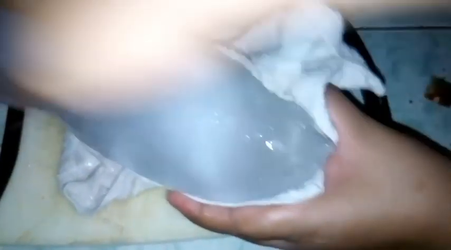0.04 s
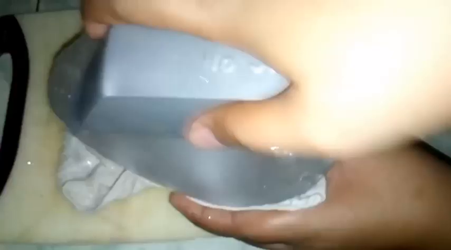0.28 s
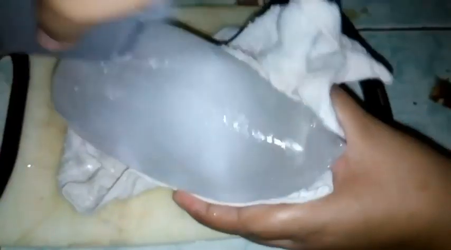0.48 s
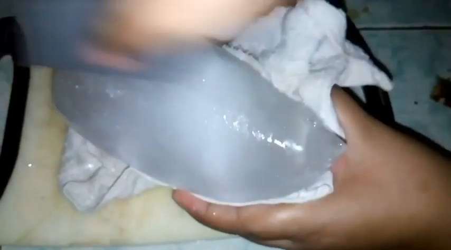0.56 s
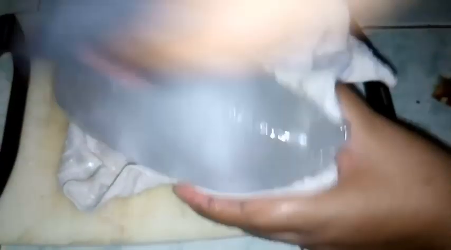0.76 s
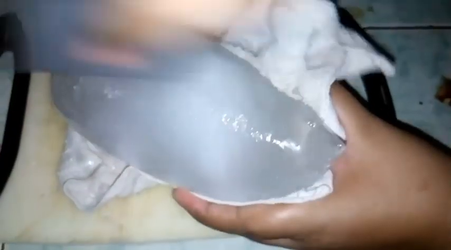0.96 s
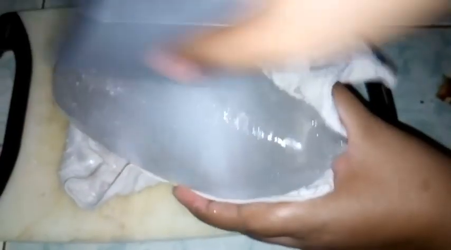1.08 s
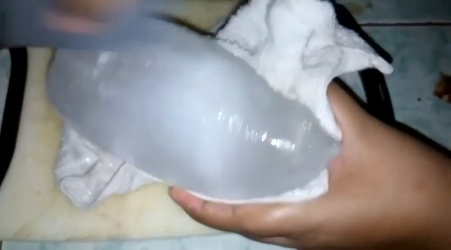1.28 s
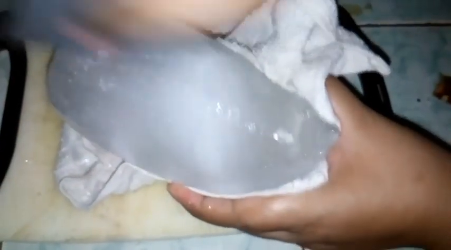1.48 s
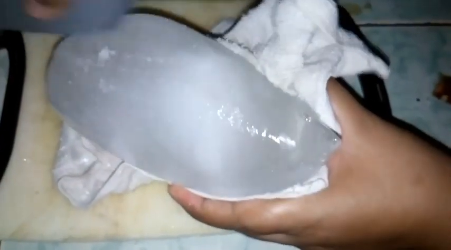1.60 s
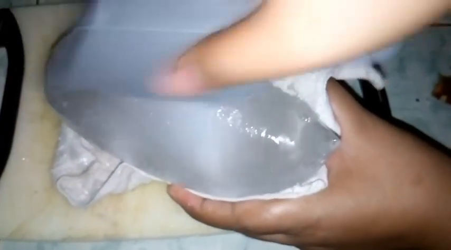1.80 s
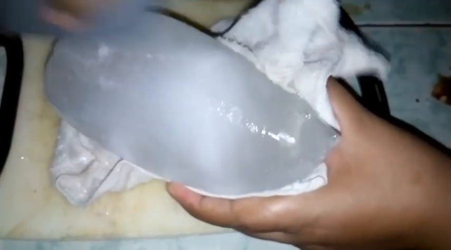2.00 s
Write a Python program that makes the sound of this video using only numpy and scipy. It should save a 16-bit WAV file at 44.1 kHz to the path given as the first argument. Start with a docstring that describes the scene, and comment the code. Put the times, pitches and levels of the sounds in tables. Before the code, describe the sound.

A hand shaver rasps over a block of ice in five short crunchy strokes, with sharp ticks, small knocks and soft return brushes between, and a sixth beginning; close microphone, small kitchen, faint hum.

```python
"""A hand shaver is pushed over a block of ice five times, and a sixth push begins: its blade breaks
off dense runs of tiny chips (random clicks), which ring the shaver and rumble in the block (resonances).
Between pushes it ticks (clicks with splinters), brushes back over the ice and knocks or clunks (noise).
Place: a small kitchen with a faint hum. Distance: near, the direct sound leading reflections and tail.
Microphone: one channel, whose sharpest peaks overload, with the top of the treble cut off."""
import sys
import numpy as np
from scipy import signal
from scipy.fft import rfft, irfft
from scipy.io import wavfile
from scipy.ndimage import uniform_filter1d

SR = 44100
rng = np.random.default_rng(int(sys.argv[2]) if len(sys.argv) > 2 else 0)


def digitize_waveform(pressure):
    """Quantize a signal to 16-bit integers and store it at the path in sys.argv[1].

    Rows of a 2-D input are taken as channels; values are limited to [-1, 1].
    """
    field = np.atleast_2d(pressure).T
    bounded = np.clip(field, -1, 1)
    quanta = np.round(bounded * 32767).astype(np.int16)
    wavfile.write(sys.argv[1], SR, quanta)


N = 90404

# Five pushes, one list each: (time [s], bright rasp level [dB], low crunch level [dB]), before the trims
PUSH_CURVES = [
    [(0.21, -34, -45), (0.224, -21, -36.5), (0.25, -15, -31), (0.29, -20.5, -28.5), (0.312, -20, -30.5),
     (0.321, -52, -47)],
    [(0.567, -37, -45), (0.577, -43.5, -40.5), (0.589, -22.5, -37), (0.631, -20, -28.5), (0.651, -22, -36),
     (0.675, -24.5, -29.5), (0.691, -33.5, -36), (0.715, -50, -60)],
    [(0.942, -63, -51), (0.964, -27, -38), (0.984, -18.5, -30.5), (1.018, -22, -28), (1.042, -29.5, -35)],
    [(1.285, -94, -89), (1.291, -57, -70), (1.309, -38, -50), (1.323, -26, -39.5), (1.349, -33, -41),
     (1.361, -20, -31.5), (1.385, -25, -30), (1.397, -17.5, -25.5), (1.426, -57, -47.5)],
    [(1.672, -54.5, -58), (1.694, -23, -35.5), (1.708, -19, -32), (1.716, -26.5, -33.5),
     (1.734, -19.5, -32.5), (1.782, -25.5, -33.5), (1.8, -35, -36.5), (1.815, -46, -67)],
]
# The sixth push, same columns; it is under way at the end
LAST_PUSH_CURVE = [(2.032, -74, -80), (2.039, -31, -47), (2.06, -25.5, -27)]
# How strongly each of the five pushes rings the shaver's six resonances: (level [dB], ... six times)
PUSH_RINGS = [(-4, -7, 8, 6, 11.5, -18), (-7, 0, -13, 1, -8, -1), (-13, 3.5, -9, -6, -1, -18),
              (-2.5, 0.5, -20, -6, -2.5, -11), (-2.5, 4, -13, -3, 3.5, 1)]
# Colour of the ice block: (frequency [Hz], relative density [dB per Hz])
BLOCK_COLOUR = [(30, -63), (80, -25), (150, -10), (280, -6), (480, -1.5), (620, -3), (900, 0), (1250, -7.5),
                (1650, 2), (2200, -2), (2800, -3), (3400, 1.5), (5000, -19), (10000, -25)]
# Lasting rings of the block on its board: (frequency [Hz], width [Hz], level [dB])
BOARD_RINGS = [(321.7, 30, -16), (497.5, 29, -17), (711.2, 26.4, -15), (805.3, 27, -15.5),
               (937.6, 16, -15.5), (1234, 32, -17.5), (2087, 43, -14)]
CHIP_SPREAD_DB = 1.5
RASP_TRIM_DB, CRUNCH_TRIM_DB = -1, -1
BITE_S = 0.0026  # time the blade takes to bite


def pushes():
    """The same breaking chips ring the shaver as a bright rasp and shake the block as a low crunch."""
    out, chips, t = np.zeros(N), fractures(CHIP_SPREAD_DB), times()
    block = with_modes(response(BLOCK_COLOUR), BOARD_RINGS)
    curves = list(PUSH_CURVES) + [LAST_PUSH_CURVE]
    rings = list(PUSH_RINGS) + [PUSH_RINGS[-1]]  # the sixth push rings like the fifth
    for curve, ring_dbs in zip(curves, rings):
        s, rasp_db, crunch_db = np.transpose(curve)
        bite = np.clip((t - s[0]) / BITE_S, 0, 1)
        cut = chips * bite * (t < s[-1])
        rasp = cut * amp(RASP_TRIM_DB + np.interp(t, s, rasp_db))
        crunch = cut * amp(CRUNCH_TRIM_DB + np.interp(t, s, crunch_db))
        out += through(rasp, shaver(ring_dbs))
        out += through(crunch, block)
    return shifting(out)


CHIPS_PER_S = 3000
CHATTER_HZ, CHATTER_DB = 183, 0  # at 0 dB the chatter leaves the clicks even


def fractures(spread_db):
    """Ice fails in tiny clicks of uneven size and random sign, evened out to a steady level."""
    size = amp(spread_db * np.minimum(rng.exponential(1, N), 3.3))
    sign = rng.choice([-1, 1], N)
    clicks = size * sign * (rng.random(N) < CHIPS_PER_S / SR)
    hz = np.fft.rfftfreq(N, 1 / SR)
    chatter_band = hz * np.exp(-hz / CHATTER_HZ)
    chatter = unit(irfft(rfft(rng.standard_normal(N)) * chatter_band, N))
    clicks = clicks * amp(CHATTER_DB * chatter)
    power = abs(uniform_filter1d(clicks ** 2, size=500))
    return clicks / np.sqrt(power + 1e-9)


# The shaver's short resonances: (frequency [Hz], width [Hz])
SHAVER_MODES = [(3950, 790), (4590, 300), (4920, 220), (5900, 150), (6300, 180), (7280, 320)]
# Colour of breaking ice: (frequency [Hz], relative density [dB per Hz])
CHIP_COLOUR = [(100, -54), (1500, -38.5), (2850, -8.5), (3350, -3.5), (3600, -5), (3900, -1.5),
               (5000, -1.5), (6600, -0.5), (7500, -0.5), (7900, -11.5), (8800, -9), (11000, -14.5),
               (13000, -21.5), (14700, -26), (16000, -46.5)]
# Faint lasting rings of the shaver's metal: (frequency [Hz], width [Hz], level [dB])
METAL_RINGS = [(4183, 20, -22), (4700, 75, -19), (5580, 21, -13), (6160, 25, -23.5), (6380, 4.7, -20.5),
               (6510, 16, -23)]
CHIP_DB = 2.5  # the crack itself, on the same scale as the short rings


def shaver(ring_dbs):
    """One chip's sound: a crack, the short ringing of the shaver and its faint lasting rings."""
    short = [(hz, width, db) for (hz, width), db in zip(SHAVER_MODES, ring_dbs)]
    struck = with_modes(amp(CHIP_DB) * response(CHIP_COLOUR), short)
    return with_modes(struck, METAL_RINGS)


SHIFT_DB, SHIFT_S, SHIFT_HZ = 3, 0.0059, 170  # rms depth; spread in time and in frequency


def shifting(x):
    """The colour shifts as the contact slides along the ice: narrow bands briefly rise and sink."""
    hz, t, z = signal.stft(x, SR, nperseg=256, noverlap=192)
    along = np.exp(-.5 * ((t - t[len(t) // 2]) / SHIFT_S) ** 2)
    across = np.exp(-.5 * ((hz - hz[len(hz) // 2]) / SHIFT_HZ) ** 2)
    noise = rng.standard_normal(z.shape)
    drift = unit(signal.fftconvolve(noise, np.outer(across, along), "same"))
    gain = unit(amp(SHIFT_DB * drift))
    return signal.istft(z * gain, SR, nperseg=256, noverlap=192)[1][:N]


# The edge snaps free of the ice: (time [s], shaver ringing level [dB], dry crack level [dB])
SNAPS = [(0.33, -7, -16), (0.3380, -9.5, -25), (0.6270, -12, -11), (0.638, -1, -24), (0.7540, -14, -26),
         (1.009, -2, -22), (1.017, -4, -6.5), (1.0456, -9.5, -9), (1.048, 7, -5), (1.0981, -12, -22),
         (1.4333, -8.5, -10), (1.4512, -16, -22), (1.8612, -50, -21), (1.9790, -22, -17.5)]
# Colour of a snap's ringing: (frequency [Hz], relative density [dB per Hz])
SNAP_COLOUR = [(100, -64), (2000, -20), (3600, -14), (4500, -2), (5200, -17.5), (5800, 3.5), (6250, 3),
               (6700, 1), (7400, -22), (8200, -17.5), (16000, -46.5)]
# Colour of its dry crack: (frequency [Hz], relative density [dB per Hz])
CRACK_COLOUR = [(30, -33), (200, -23), (900, -2.5), (2000, 2.5), (3400, 0.5), (6500, 5.5), (8000, -15),
                (11000, -21.5), (16000, -45)]
SPLINTER_S, SPLINTER_DB = .001, -1.5  # decay; energy against the snap's first click


def ticks():
    """Single sharp snaps, each a click trailed by a few splinters, ring the shaver and crack dryly."""
    out, t = np.zeros(N), times()
    ringing, crack = response(SNAP_COLOUR), response(CRACK_COLOUR)
    for s, ring_db, crack_db in SNAPS:
        splinters = (t > s) * np.exp(-abs(t - s) / SPLINTER_S) * rng.standard_normal(N)
        snap = amp(SPLINTER_DB) * splinters / np.linalg.norm(splinters)
        snap[round(s * SR)] += 1
        out += through(snap, amp(ring_db) * ringing + amp(crack_db) * crack)
    return out


# The shaver knocks against the block: (time [s], level [dB], decay [s])
KNOCK_BLOWS = [(0.014, -46, 0.0029), (0.1305, -28.5, 0.0036), (0.193, -34.5, .008), (0.495, -36.5, 0.015),
               (0.560, -38, .005), (0.702, -36, 0.0029), (0.7765, -39, 0.0049), (0.838, -47.5, 0.004),
               (0.916, -60, 0.0061), (1.099, -34.5, 0.0049)]
# Colour of a knock: (frequency [Hz], relative density [dB per Hz])
KNOCK_COLOUR = [(30, -40), (100, -18.5), (400, -6), (750, 1), (1050, 5.5), (1400, -1), (2200, -3),
                (2700, -6), (3100, -5.5), (4000, -5), (6400, -6), (8000, -20), (11000, -29), (13000, -55),
                (16000, -76.5)]


def knocks():
    """The shaver knocks against the block: short blows, strongest in the middle range."""
    return contacts(KNOCK_BLOWS, KNOCK_COLOUR)


# Hollow clunks as the shaver seats itself: (time [s], level [dB], decay [s])
CLUNK_BLOWS = [(0.196, -23.5, 0.0026), (0.207, -30.5, 0.0057), (0.432, -51, 0.036), (0.548, -36, 0.008),
               (0.869, -48.5, 0.014), (0.915, -41.5, 0.0053), (1.962, -46.5, .012)]
# Colour of a clunk: (frequency [Hz], relative density [dB per Hz])
CLUNK_COLOUR = [(30, -58), (150, -31), (450, -14.5), (700, -22), (880, -1), (1060, 1), (1350, -14.5),
                (3000, -35), (6000, -26), (10000, -46.5), (16000, -86)]


def clunks():
    """The shaver seats itself: hollow blows gathered around 1 kHz."""
    return contacts(CLUNK_BLOWS, CLUNK_COLOUR)


# What rings on in the shaver's body after a blow: (frequency [Hz], width [Hz], level [dB])
BODY_RINGS = [(1074, 80, -13), (1545, 50, -24.5), (2467, 30, -18.5), (3100, 16, -16.5)]
CONTACT_RISE_S = 0.0029


def contacts(rows, colour):
    """Gritty blows of noise that swell for a moment, die away and ring the shaver's body."""
    out, t, body = np.zeros(N), times(), with_modes(response(colour), BODY_RINGS)
    for s, db, decay in rows:
        age = np.maximum(t - s, 0)
        swell = 1 - np.exp(-(age / CONTACT_RISE_S) ** 2)
        shape = swell * np.exp(-age / decay)
        blow = through(shape * rng.standard_normal(N), body)
        # the level holds for the envelope's peak, whatever the decay
        out += amp(db) * blow * np.linalg.norm(shape / shape.max()) / np.linalg.norm(blow)
    return out


# Light brushes on the way back: (time of peak [s], level [dB], spread [s], squeak level [dB])
BRUSH_TOUCHES = [(0.335, -46, 0.03, -15), (0.769, -35, 0.011, -17), (0.834, -65, 0.038, -22),
                 (1.053, -35, 0.0084, -26), (1.101, -39, 0.0032, -16), (1.147, -73, 0.024, -36),
                 (1.425, -41, 0.027, -5), (1.519, -32.5, 0.0037, -3.5), (1.536, -52.5, 0.032, -13),
                 (1.87, -41, 0.0095, -13), (1.892, -28.5, 0.0045, -4), (1.937, -53.5, 0.042, -20)]
# Colour of a brush: (frequency [Hz], relative density [dB per Hz])
BRUSH_COLOUR = [(30, -30), (130, 1.5), (300, -5.5), (850, 0), (1400, -9), (2100, -2.5), (2900, -14.5),
                (3700, -5), (4400, -1.5), (5100, -7.5), (6400, 0.5), (7300, -2.5), (8000, -11.5),
                (11000, -18), (16000, -42.5)]
BRUSH_SPREAD_DB = 1.5
SQUEAK_HZ, SQUEAK_WIDTH_HZ = 4230, 140


def brushes():
    """The unloaded shaver grazes the ice: swells of tiny clicks with more or less of a squeak."""
    out, grit, colour = np.zeros(N), fractures(BRUSH_SPREAD_DB), response(BRUSH_COLOUR)
    for s, db, spread, squeak_db in BRUSH_TOUCHES:
        touch = amp(db) * np.exp(-.5 * ((times() - s) / spread) ** 2)
        squeak = [(SQUEAK_HZ, SQUEAK_WIDTH_HZ, squeak_db)]
        out += through(touch * grit, with_modes(colour, squeak))
    return out


# How long the kitchen rings: (frequency [Hz], time to fall 60 dB [s])
KITCHEN_T60 = [(150, 2.1), (500, 0.33), (1400, 0.47), (3700, 0.28), (6300, 0.31), (10000, 0.09)]
# Strength of its tail: (frequency [Hz], level [dB])
KITCHEN_TAIL = [(100, -15.5), (400, -6), (850, -3), (1500, -12.5), (3500, -8), (5000, -24.5), (6400, -17),
                (8000, -8), (14000, -2.5)]
ECHO_DB, ECHO_SPAN_S = -11, .012  # all reflections together; span of their arrivals


def kitchen(x, count=10):
    """Direct sound, near reflections off the counter, and a tail of noise decaying band by band."""
    hz, t, z = signal.stft(rng.standard_normal(SR), SR, nperseg=256)
    t60 = read(KITCHEN_T60, hz)[:, None]
    decay = np.exp(-np.log(1000) * t / t60)
    even_energy = np.sqrt(2 * np.log(1000) / (t60 * SR))  # same energy for any decay time
    z = z * amp(read(KITCHEN_TAIL, hz)[:, None]) * decay * even_energy
    fade_in = np.minimum(np.arange(SR) / SR / 0.0041, 1)
    h = signal.istft(z, SR, nperseg=256)[1][:SR] * fade_in
    at = (SR * ECHO_SPAN_S * (0.0974 + rng.random(count))).astype(int)
    h[at] += amp(ECHO_DB) * rng.choice([-1, 1], count) / np.sqrt(count)
    h[0] = 1  # direct sound
    return through(x, h)


# Colour of the room noise: (frequency [Hz], relative density [dB per Hz])
FLOOR_COLOUR = [(20, -3.5), (60, -9.5), (110, 2.5), (170, -4), (300, -14.5), (800, -14), (1500, -25),
                (3000, -23), (6500, -20), (9000, -33.5), (16000, -53)]
# Colour of the room still ringing at the start: (frequency [Hz], relative density [dB per Hz])
LINGER_COLOUR = [(100, -12), (800, 0), (1500, -10.5), (4000, -11), (6400, -5), (8000, -19.5), (12000, -38)]
FLOOR_DB = -60.5
HUM_HZ, HUM_WIDTH_HZ, HUM_DB = 111.3, 32, -65
LINGER_DB, LINGER_FALL_DB_PER_S = -52, 98.5


def background():
    """Coloured room noise, noise narrowed to a wavering hum, and the dying tail of an earlier push."""
    air, drone, tail = rng.standard_normal((3, N))
    resonance = ring(HUM_HZ, HUM_WIDTH_HZ)
    hum = amp(HUM_DB) * unit(through(through(drone, resonance), resonance))
    fall = amp(LINGER_DB - LINGER_FALL_DB_PER_S * times())
    linger = fall * through(tail, response(LINGER_COLOUR))
    return amp(FLOOR_DB) * through(air, response(FLOOR_COLOUR)) + hum + linger


def amp(db):
    """Decibels to gain."""
    return 10 ** (np.asarray(db) / 20)


def unit(x):
    """Scales to rms 1."""
    return x / np.sqrt(np.mean(x ** 2) + 1e-20)


def read(points, hz):
    """Reads a table along log frequency."""
    f, value = np.transpose(points)
    return np.interp(np.log(hz + 1), np.log(f + 1), value)


def times():
    """Seconds at every sample."""
    return np.arange(N) / SR


def response(points, size=4096):
    """Causal (minimum-phase) impulse response of energy 1 with the given colour."""
    log_gain = np.log(amp(read(points, abs(np.fft.fftfreq(size, 1 / SR)))))
    spectrum = np.exp(np.conj(signal.hilbert(log_gain)))
    h = np.fft.ifft(spectrum).real[:size // 2]
    return h / np.linalg.norm(h)


def through(x, h):
    """Convolves and keeps the scene's length."""
    return signal.fftconvolve(x, h)[:N]


def ring(hz, width, size=12000):
    """A dying resonance; the wider it is, the faster it dies."""
    t = np.arange(size) / SR
    return np.exp(-np.pi * width * t) * np.cos(2 * np.pi * hz * t)


def with_modes(h, modes):
    """Passes a response through added resonances (Hz, width Hz, dB); energy 1."""
    out = np.pad(h, (0, len(ring(1, 1)) - 1))
    for hz, width, db in modes:
        rung = signal.fftconvolve(h, ring(hz, width))
        out = out + amp(db) * rung / np.linalg.norm(rung)
    return out / np.linalg.norm(out)


def scene():
    """All the work on the ice, heard in the kitchen over its background."""
    work = pushes() + ticks() + knocks() + clunks() + brushes()
    return (kitchen(work) + background())[None]


EDGE_HZ = 15500


def record(dry):
    """The sharpest peaks overload and are clipped; then a low-pass sets the band limit."""
    held = np.clip(dry, -.56, .56)
    low_pass = signal.firwin(511, EDGE_HZ, window=("kaiser", 9), fs=SR)
    return signal.oaconvolve(held, low_pass[None], "same")


dry = scene()
out = record(dry)
digitize_waveform(out)
```